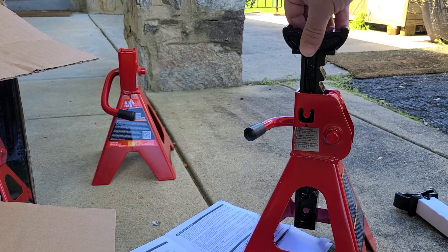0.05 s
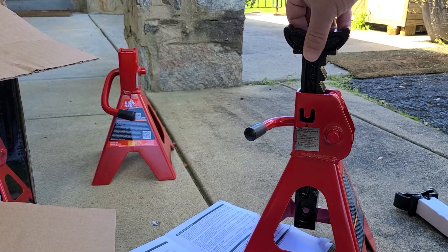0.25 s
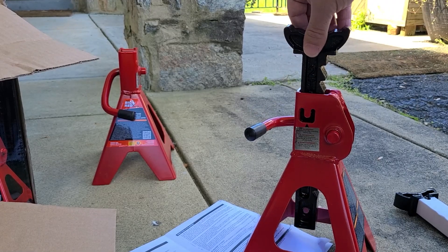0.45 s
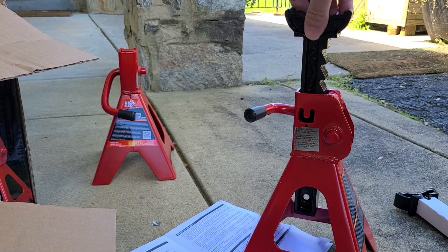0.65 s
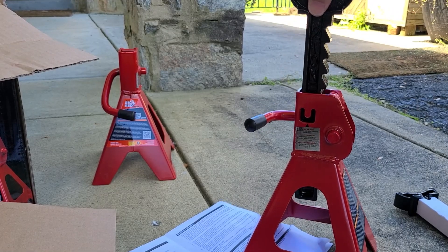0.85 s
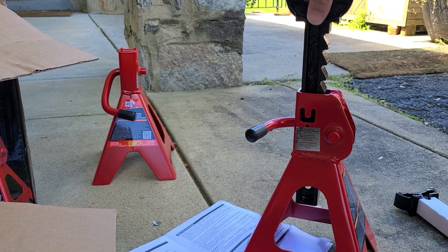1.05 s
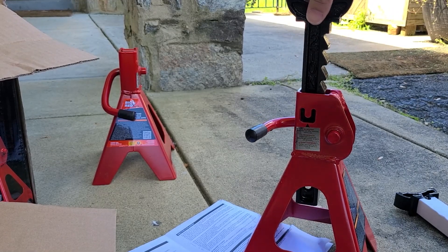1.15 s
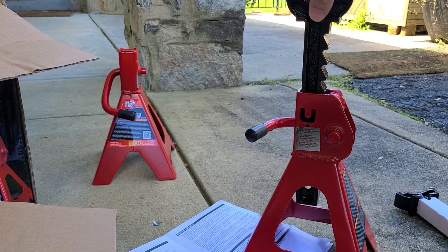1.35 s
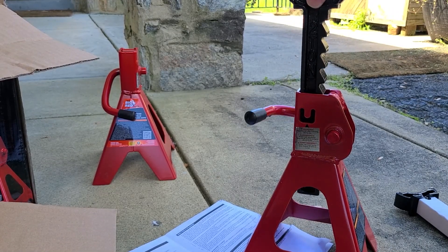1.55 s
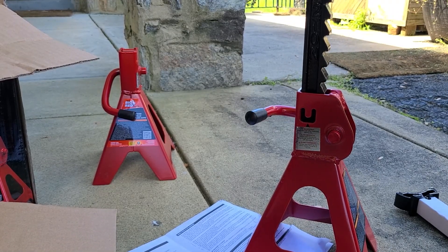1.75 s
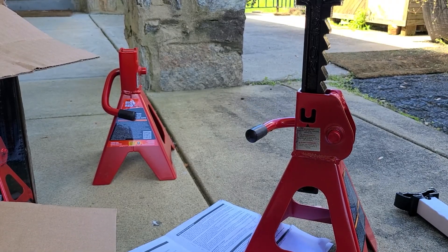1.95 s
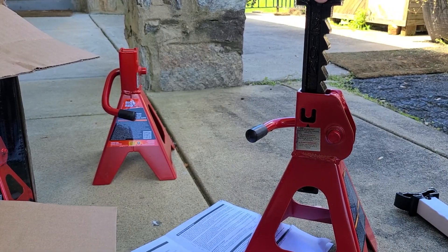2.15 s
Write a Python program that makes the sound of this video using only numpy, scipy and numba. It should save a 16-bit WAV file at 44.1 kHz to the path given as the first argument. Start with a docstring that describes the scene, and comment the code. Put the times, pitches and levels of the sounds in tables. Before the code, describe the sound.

Ratchet clicks of a toothed steel post in two short bursts, ending in a loud clank

```python
"""On concrete outdoors, a toothed steel post is lifted through a stand close to two microphones.
The latch scrapes up each tooth and drops; scrape and blows excite decaying modes of the steel parts.
Wind rumbles as gusting low noise over a distant hush of shaped noise, and a bird peeps once as a sine.
Gain control lowers the level after loud blows, and a soft ceiling rounds the peaks."""
import sys
import numpy as np
from scipy import signal
from scipy.fft import rfft, irfft
from scipy.io import wavfile
from scipy.ndimage import uniform_filter1d
from numba import njit

SR = 44100
rng = np.random.default_rng(int(sys.argv[2]) if len(sys.argv) > 2 else 0)


def master_out(mix):
    """Clip the mix to full scale and print it as 16-bit PCM to the path in sys.argv[1]."""
    frames = np.transpose(np.atleast_2d(mix))
    ceiling = np.clip(frames, -1, 1)
    pcm = np.round(ceiling * 32767).astype(np.int16)
    wavfile.write(sys.argv[1], SR, pcm)


def amplitude_ratio(level_db):
    """Convert a level in decibels to the matching linear amplitude (field) ratio."""
    exponent = np.asarray(level_db, float) / 20
    return 10 ** exponent


N = 97108  # length in samples

# Modes of the steel parts: the low and upper modes of the legs, the latch and the post. Each row: frequency in
# Hz, relative level in dB, 60 dB decay time # in seconds, left minus right level in dB, phase lead of the left
# in radians.
LEG_MODES = [(773, -8, .08, 10.5, 0), (837, 4, .1, -2.5, 0.32), (862, 4.5, .1, 10.5, 0.86),
             (884, 10, .14, 6, 0.), (1047, -11, 0.22, 10, 3.1)]
UPPER_LEG_MODES = [(1423, -7.5, .1, 0.1, -.7), (1672, -1, 0.22, -9, -0.12), (1762, 0, .13, -10, 1.7),
                   (2055, -6.5, 0.24, -5.5, .7), (2150, -6.5, 0.11, -4.5, -.4), (2298, -13, .13, -2, .5)]
LATCH_MODES = [(2487, -10.5, 0.096, 8.0, 2.7), (2547, -7.5, 0.19, 5, -3.5), (2743, 2, 0.083, 2.7, -0.7),
               (2800, 8.5, 0.099, -2.5, 1.16), (2856, 6.5, 0.18, 5.5, 2.1), (3007, -5, 0.1, 14, 2.06),
               (3093, -3.5, 0.18, -4.5, -4), (3265, -2, 0.091, 6.5, -3), (3340, -5, 0.077, 7, 2.7),
               (3400, 0, 0.078, 2.3, -2.3), (3664, -12, 0.094, 7.9, 1), (3730, 0, 0.11, 3.5, 0.5),
               (3870, -32, 0.057, -7, -3.4), (4680, -13, 0.075, -3.5, 2.8)]
POST_MODES = [(1987.6, 4.5, 0.4, -8.5, 1.46), (3530, 6.5, 0.29, -4, 2), (4286, -3, 0.26, 1, 1.54),
              (4420, -8, 0.23, -0.7, -4), (4663, -8, 0.3, 3, 1.9), (4830, 0, 0.19, 2.4, -2),
              (5024, -3.5, 0.2, 7, -1.4), (5260, -18, 0.22, 2.3, -5.5), (5680, 1.5, 0.22, -3.5, -2.5),
              (5828, 0, 0.33, 3.5, 2.56), (6013, -10, 0.25, 20, 1.05), (6340, -7.5, 0.29, 5.5, -2.5),
              (6520, -13.5, 0.32, 12, 1.23), (6770, -11.0, 0.27, 9, 2.44), (7510, -31, 0.3, 8.5, -0.2),
              (7376, -17.5, 0.31, 19, 1.5)]
# Trend of the many small modes of the welded steel. Each row: frequency in Hz, relative level in dB.
SMALL_MODE_TREND = [(150, -50), (300, -23), (670, -19.5), (1000, -22.5), (1800, -11), (3200, -9.5),
                    (4500, -15.5), (7000, -29.5), (11000, -37.5), (16000, -39)]
SMALL_T60_S, SMALL_T60_SLOPE = 0.14, -0.036  # median decay time at 1 kHz, exponent over frequency
SMALL_SCATTER_DB = 3.5
RING_S, BUILD_S = 0.4, 0.00034  # length of each ring, time constant of its onset

# Blows of the latch. Each row: start in seconds, drive in dB into the low leg modes, upper leg modes, latch,
# post and # small modes, decay time constant of the chatter in seconds.
BLOWS = [(-.06, -46, -42.5, -40.5, -52, -32.5, 0.0068), (.498, -41.5, -56, -64, -79, -42.5, 0.0048),
         (.531, -39.5, -62.5, -65, -74, -56.5, 0.012), (0.553, -36, -45, -40, -66.5, -44.5, 0.0083),
         (0.593, -45.5, -44.5, -43, -60, -36.5, 0.0059), (0.614, -42.5, -45.5, -51.5, -61, -42.5, 0.0068),
         (.655, -38, -45.5, -44.5, -69, -50.5, 0.0053), (.689, -31, -29.5, -31, -58.5, -27, 0.011),
         (.716, -41, -41, -31, -61, -42, 0.011), (0.757, -33.5, -45, -46.5, -68, -46, 0.0017),
         (0.7831, -31, -31.5, -27.5, -33.5, -22, 0.0075), (.798, -34.5, -37, -17.5, -53.5, -34.5, 0.0069),
         (0.8909, -37, -29, -33, -40.5, -36, 0.0017), (.896, -24.5, -25, -20.5, -44, -18, 0.0014),
         (.963, -32.5, -39, -47, -73, -60, 0.0021), (1.473, -38.5, -48.5, -60, -72, -62.5, 0.013),
         (1.508, -35.5, -47, -44, -64, -40, .008), (1.544, -34, -54, -46, -61, -51, 0.0041),
         (1.563, -43.5, -22.5, -29.5, -59.5, -35, 0.0013), (1.6118, -29.5, -26, -14.5, -32, -18, 0.0041),
         (1.634, -30.5, -29.5, -21, -50.5, -27.5, 0.0052), (1.696, -39.5, -43.5, -40, -56.5, -43, 0.0074),
         (1.748, -49, -51, -63.5, -70, -55, 0.0053), (1.795, -59.5, -56, -40.5, -70, -38.5, .008),
         (1.8172, -18, -15, -12.5, -26.5, -9.5, 0.0036), (1.829, -21.5, -20.5, -24, -26.5, -25.5, .004)]
LEAD_S = 0.1  # time computed ahead of the start, also the length of each blow
CHATTER_DB, RISE_S = 1, 0.0011  # chatter level, time constant of its swell
# Below HARD_DB of small-mode drive, blows knock less and are duller.
HARD_DB, SOFTEN = -17, 0.31  # threshold, extra loss of the knock in dB per dB
HARD_CONTACT_HZ, OCTAVES_PER_DB = 12100, 0.11  # low-pass corner of hard blows, its fall

# Scrape of the latch on the teeth. Each row: time in seconds, relative drive in dB into the low leg modes, #
# relative drive in dB into the other modes.
SCRAPE = [(.4, -110, -110), (.48, -62, -73.5), (.56, -51.5, -59.5), (.64, -49, -52.5), (.75, -50, -51),
          (.85, -63, -58), (.98, -61, -62), (1.08, -110, -110), (1.4, -110, -110), (1.48, -55, -64),
          (1.56, -54.5, -54.5), (1.65, -53, -56.5), (1.73, -63, -64), (1.8, -68, -61), (1.9, -110, -110)]
# Offsets on the latter drive: upper leg, latch, post and small modes, all in dB.
SCRAPE_OFFSETS_DB = (-1, 1.5, -18.5, 1)
SCRAPE_GRAIN_DB = 3.5  # mean of the random lift of each sample

# Wind at the microphones. Each row: time in seconds, relative level in dB, left minus right
# parameter in dB (half is added on the left and half taken from the right).
WIND = [(0.0, -39, -8), (0.15, -44.5, 5), (0.21, -52, 5.5), (0.59, -45.5, -11.5), (0.63, -48.5, -1),
        (0.65, -39.5, 4.5), (0.82, -39, 0.5), (0.99, -32, -10), (1.02, -42.5, -4), (1.33, -42, 8.5),
        (1.35, -43.5, 0), (1.59, -40, 6.5), (1.62, -26, 0.5), (1.66, -26, -10), (1.68, -37.5, 1.5),
        (1.83, -33, -2.5), (2.18, -35.5, 0.5), (2.2, -46.5, 0.5)]
# Wind spectrum. Each row: frequency in Hz, relative density in dB.
WIND_COLOUR = [(12, -37.5), (20, -8), (48, 0.5), (70, 4), (98, -1), (161, -15), (320, -18), (420, -42),
               (700, -120)]
WIND_SHARED_DB = -3.5  # part common to both microphones, relative to each separate part

# Spectrum of the hush. Each row: frequency in Hz, relative density in dB.
HUSH_COLOUR = [(82, -42.5), (140, -8.5), (171, 0), (322, -15), (508, -10), (595, -19), (632, -13),
               (1290, -13), (2000, -21), (2910, -26), (7380, -52), (16000, -67.5)]
HUSH_DB = -53
# Likeness of the hush left and right. Each row: frequency in Hz, correlation.
HUSH_LIKENESS = [(60, 0.02), (130, 0.59), (290, 0.77), (640, 0.25), (1410, -0.26), (3100, 0.12),
                 (6820, 0.03), (15000, -0.0)]

# Peep of the bird. Its one row: length in seconds (negative: counted back from the end),
# frequency in Hz, level in dB, left minus right level in dB.
PEEP = (-0.08, 2635, -57, 20)
PEEP_END_S = 1.163

KNEE_DB, RATIO, ATTACK_S, RELEASE_S = -15.5, 1.523, 0.0026, 0.29  # gain control
CEILING = 0.94  # largest amplitude of the soft ceiling


def curve(table, at, col=1, log=False):
    """Linear interpolation in a table column, over the logarithm of the abscissa if log."""
    table = np.array(table, float)
    x = table[:, 0]
    if log:
        at, x = np.log(at), np.log(x)
    return np.interp(at, x, table[:, col])


def coloured(colour, weight=lambda hz: 1):
    """Spectral shaping: white noise is multiplied by a magnitude curve, without normalisation."""
    hz = np.maximum(np.arange(N // 2 + 1) * SR / N, 1)
    spectrum = rfft(rng.standard_normal(N))
    return irfft(spectrum * amplitude_ratio(curve(colour, hz, log=True)) * weight(hz), N)


def walk(rate):
    """Slow random modulation: values held for 1 / rate seconds are smoothed twice."""
    hold = int(SR / rate)
    steps = np.repeat(rng.standard_normal(N // hold + 1), hold)
    return 2.1 * uniform_filter1d(uniform_filter1d(steps, hold), hold)[:N]


def body(force, modes):
    """Modal superposition: a force excites decaying sines, each with its own pan and phase lead."""
    hz, db, t60, pan, lead = np.array(modes, np.float32).T[:, :, None]
    t = np.arange(int(RING_S * SR), dtype=np.float32) / SR
    phase = 2 * np.pi * (hz * t + rng.random(hz.shape).astype(np.float32))
    fade = amplitude_ratio(db - 60 * t / np.clip(t60, .01, 1))
    left = (fade * amplitude_ratio(pan / 2) * np.sin(phase + lead)).sum(0)
    right = (fade * amplitude_ratio(-pan / 2) * np.sin(phase)).sum(0)
    response = np.array([left, right]) * (1 - np.exp(-t / BUILD_S)) ** 2
    return signal.fftconvolve(force[None], response, axes=1)[:, :len(force)]


def small_modes(count=260):
    """Statistical modal density: random modes, denser at low frequency, scatter about a level trend."""
    place, turn = rng.random((count, 2)).T
    level, decay, pan = rng.standard_normal((count, 3)).T
    hz = 300 + 15500 * ((np.arange(count) + place) / count) ** 1.5
    db = curve(SMALL_MODE_TREND, hz, log=True) + SMALL_SCATTER_DB * level
    t60 = SMALL_T60_S * (hz / 1000) ** SMALL_T60_SLOPE * amplitude_ratio(2.0 * decay)
    return np.array([hz, db, t60, 4 * pan, 2 * np.pi * turn]).T


def scrape_force(t):
    """Frictional excitation: the scrape is a run of tiny uneven clicks, shared out to five groups of modes."""
    grain_db = SCRAPE_GRAIN_DB * rng.exponential(size=len(t)) - 31
    grit = amplitude_ratio(grain_db) * rng.standard_normal(len(t))
    into_legs = curve(SCRAPE, t)
    into_rest = curve(SCRAPE, t, col=2) + np.array(SCRAPE_OFFSETS_DB)[:, None]
    return grit * amplitude_ratio(np.vstack([into_legs, into_rest]))


def blow_force(age, weak_db, chatter_s):
    """Impact excitation: a knock and a swelling, dying chatter, low-passed by the contact."""
    chatter_s = np.clip(chatter_s, .0005, .03)
    swell = (1 - np.exp(-age / RISE_S)) * np.exp(-age / chatter_s)
    level = amplitude_ratio(CHATTER_DB) * np.sqrt(2 / (chatter_s * SR))
    push = level * rng.standard_normal(len(age)) * swell
    push[0] += amplitude_ratio(SOFTEN * weak_db)  # the knock
    contact_hz = HARD_CONTACT_HZ * 2 ** (OCTAVES_PER_DB * weak_db)
    keep = np.exp(-2 * np.pi * contact_hz / SR)
    return signal.lfilter([1 - keep], [1, -keep], push)


def stand():
    """Forced vibration: scrape and blows together drive the low and upper modes of the legs, and the modes of
    latch and post."""
    lead = int(LEAD_S * SR)
    t = np.arange(-lead, N) / SR
    force = scrape_force(t)
    age = np.arange(lead) / SR
    for start_s, *levels_db, chatter_s in BLOWS:
        weak_db = min(levels_db[-1] - HARD_DB, 0)
        i = int(start_s * SR) + lead
        drive = amplitude_ratio(np.array(levels_db))[:, None]
        force[:, i:i + lead] += drive * blow_force(age, weak_db, chatter_s)
    parts = (LEG_MODES, UPPER_LEG_MODES, LATCH_MODES, POST_MODES, small_modes())
    return sum(body(f, modes) for f, modes in zip(force, parts))[:, lead:]


def bird():
    """Pure tone: one short faint peep is a sine under a half-sine envelope."""
    length, hz, db, pan_db = PEEP
    t = np.arange(N) / SR - PEEP_END_S
    envelope = np.sin(np.pi * np.clip(t / length, 0, 1))
    tone = envelope * np.sin(2 * np.pi * hz * t)
    return tone * amplitude_ratio(db + np.array([[pan_db], [-pan_db]]) / 2)


def wind():
    """Partial coherence: gusting low noise at each microphone is mixed with a common part."""
    t = np.arange(N) / SR
    left, right, both = (coloured(WIND_COLOUR) * amplitude_ratio(2 * walk(12)) for _ in range(3))
    pair = np.array([left, right]) + amplitude_ratio(WIND_SHARED_DB) * both
    pan = curve(WIND, t, col=2) / 2
    level_db = curve(WIND, t) + 4 + np.array([pan, -pan])
    return pair / pair.std() * amplitude_ratio(level_db)


def likeness(hz):
    """Interchannel correlation: the likeness of left and right at each frequency, bounded."""
    return np.clip(curve(HUSH_LIKENESS, hz, log=True), -.95, .95)


def hush():
    """Diffuse field: distant traffic and leaves are noise whose sum and difference set the likeness."""
    mid = coloured(HUSH_COLOUR)
    side = coloured(HUSH_COLOUR, lambda hz: np.sqrt((1 - likeness(hz)) / (1 + likeness(hz))))
    level_db = HUSH_DB + .5 * walk(4.9) + 0.59 * walk(12)
    return np.array([mid + side, mid - side]) / mid.std() * amplitude_ratio(level_db)


def scene():
    """Superposition: the pressures of all sources add."""
    return stand() + wind() + hush() + bird()


@njit
def follow(x, attack, release):
    """Envelope detection: a one-pole follower rises and falls at separate rates."""
    out, e = np.empty(len(x)), 0.
    for i in range(len(x)):
        e += (x[i] - e) * (attack if x[i] > e else release)
        out[i] = e
    return out


def low_pass(x):
    """Removes everything above the highest recorded frequency."""
    return signal.sosfilt(signal.butter(12, 16480, fs=SR, output="sos"), x)


def record(dry):
    """Dynamic compression: gain falls as the envelope passes a knee; a tanh softly limits peaks."""
    envelope = follow(np.abs(dry).max(axis=0), 1 / (ATTACK_S * SR), 1 / (RELEASE_S * SR))
    over_knee = amplitude_ratio(KNEE_DB) / (envelope + 1e-9)
    gain = np.minimum(1, over_knee ** (1 - 1 / RATIO))
    return low_pass(CEILING * np.tanh(dry * gain / CEILING))


dry = scene()
out = record(dry)
master_out(out)
```